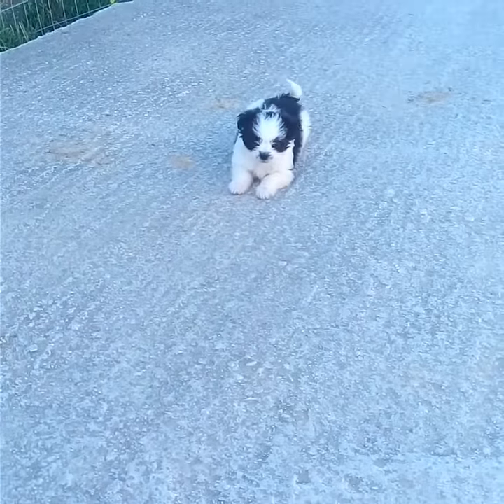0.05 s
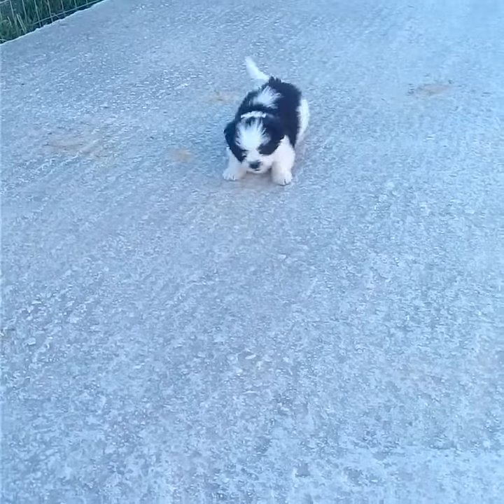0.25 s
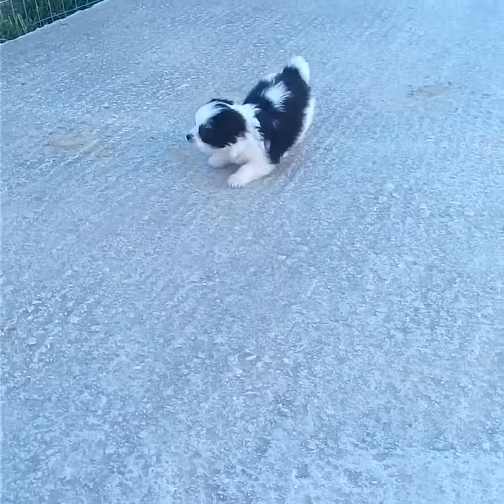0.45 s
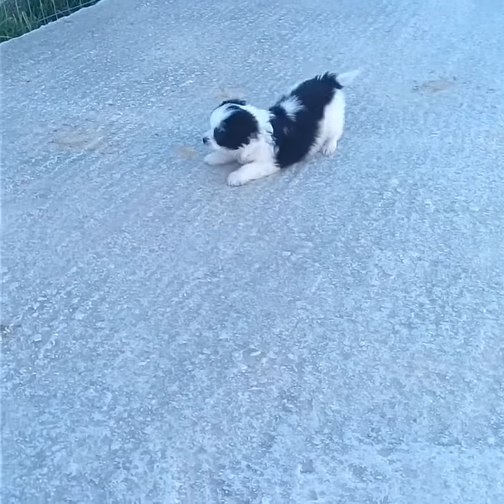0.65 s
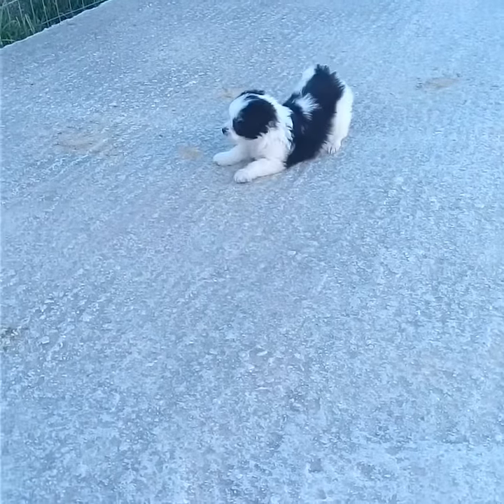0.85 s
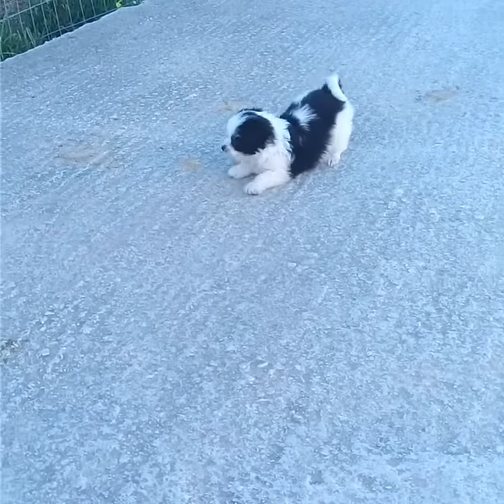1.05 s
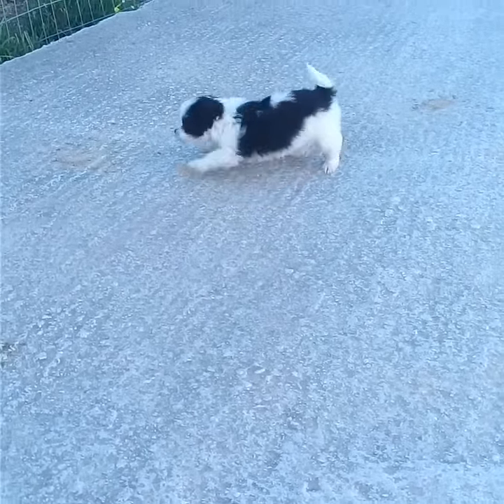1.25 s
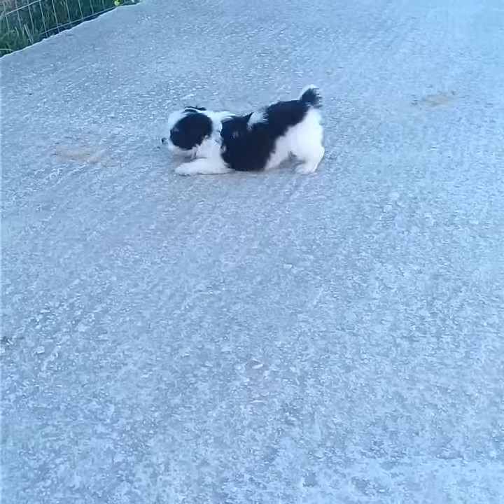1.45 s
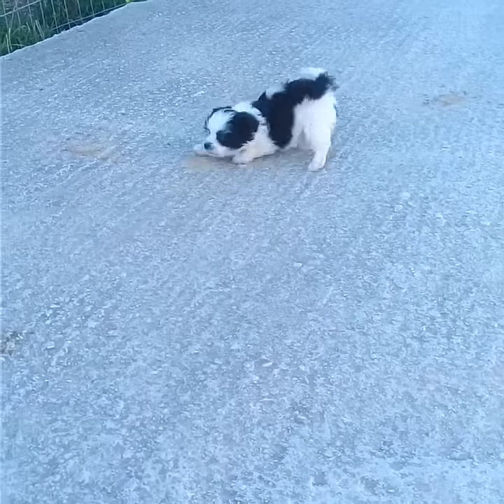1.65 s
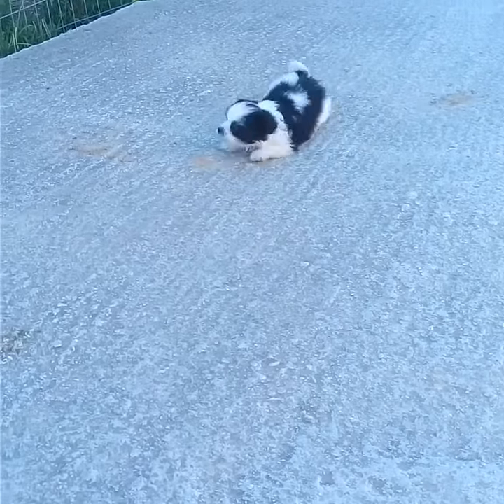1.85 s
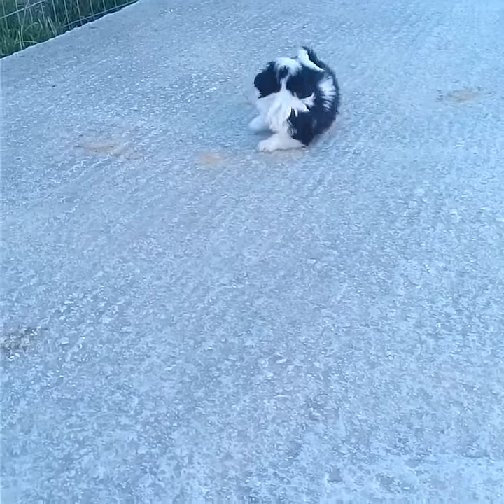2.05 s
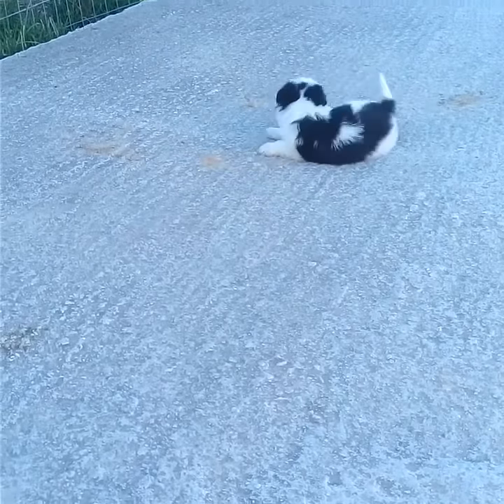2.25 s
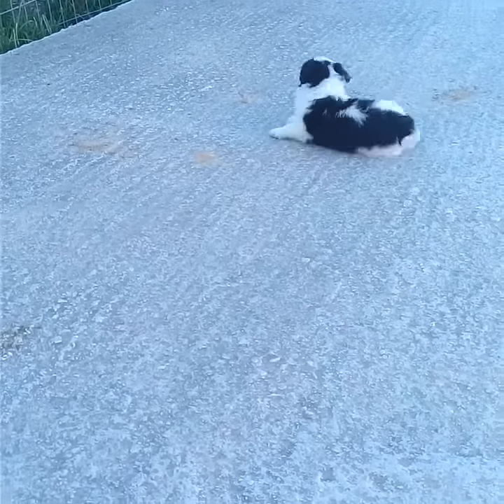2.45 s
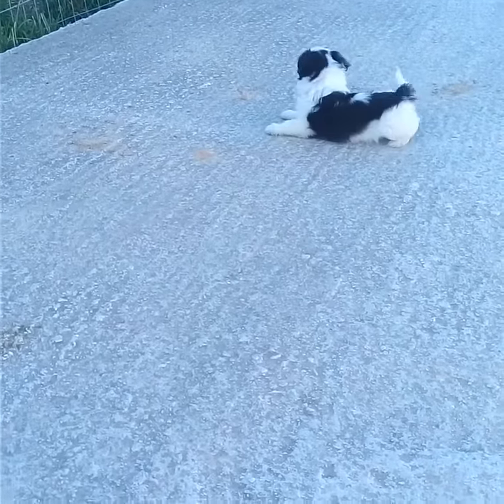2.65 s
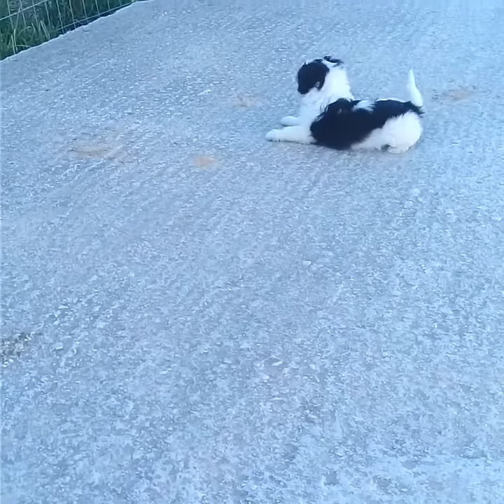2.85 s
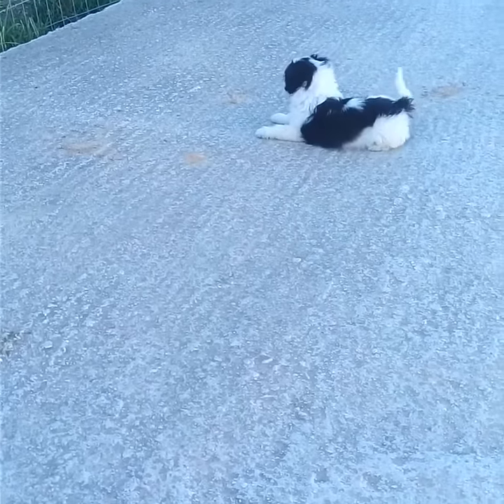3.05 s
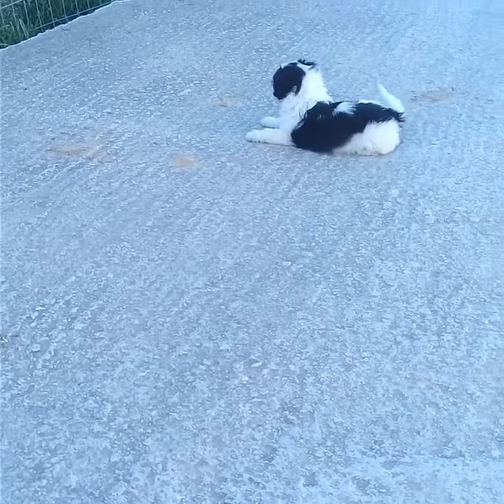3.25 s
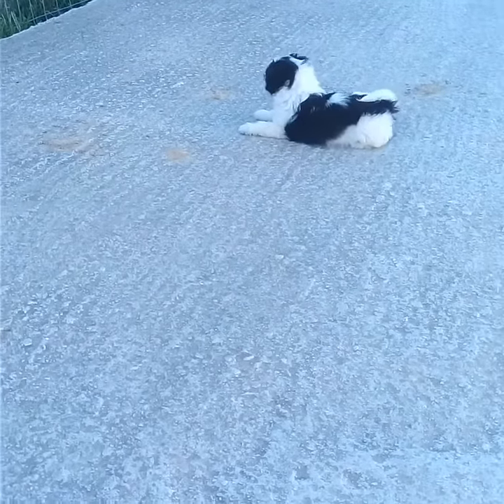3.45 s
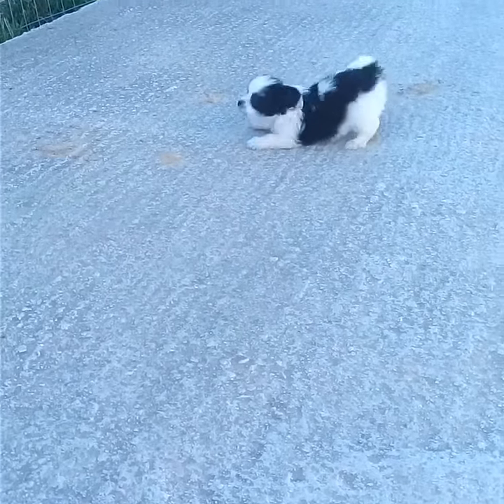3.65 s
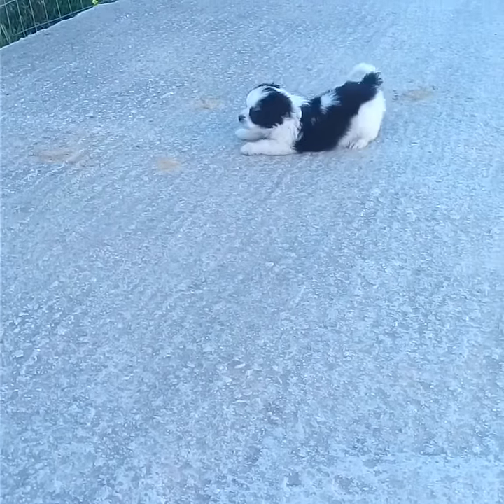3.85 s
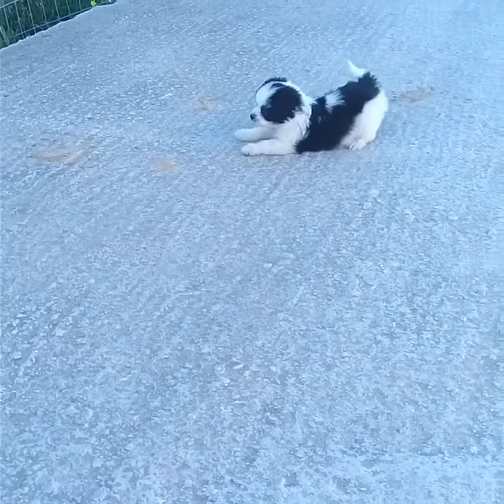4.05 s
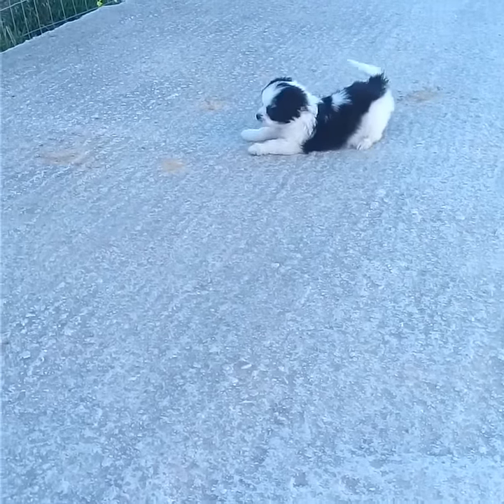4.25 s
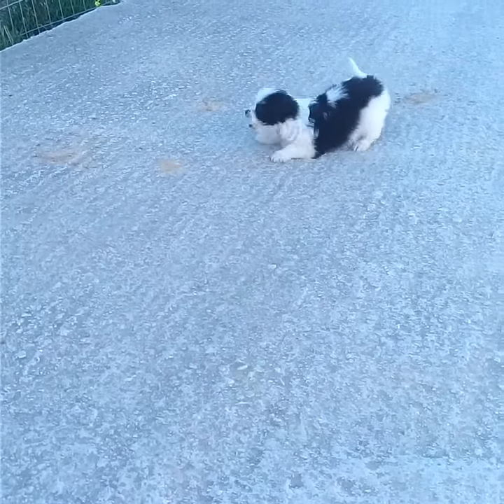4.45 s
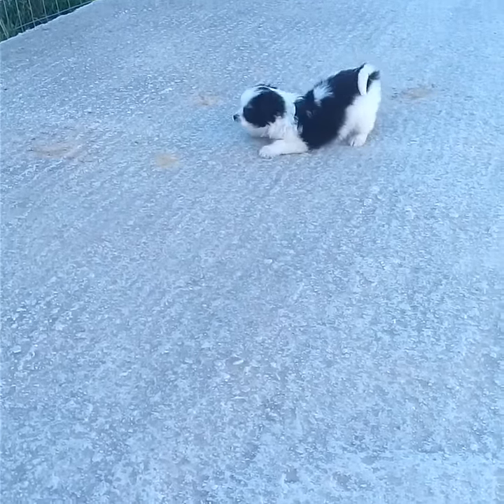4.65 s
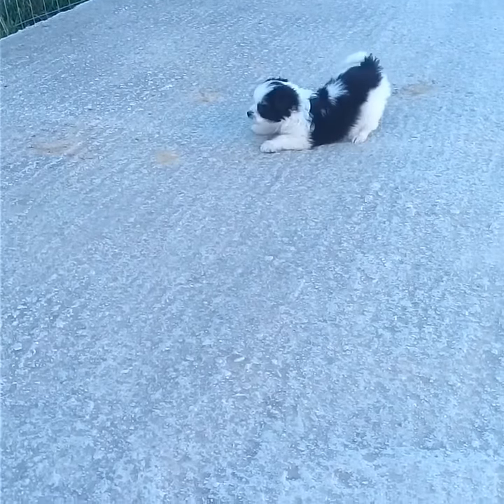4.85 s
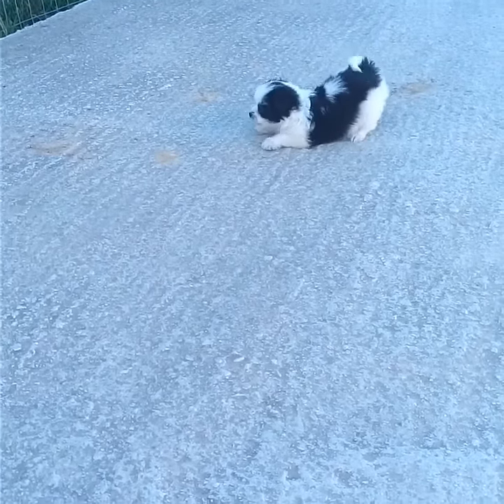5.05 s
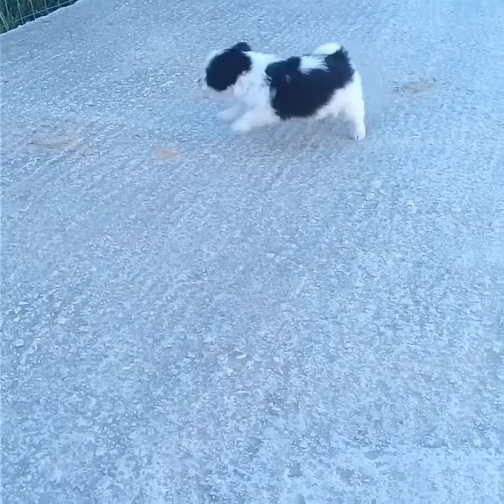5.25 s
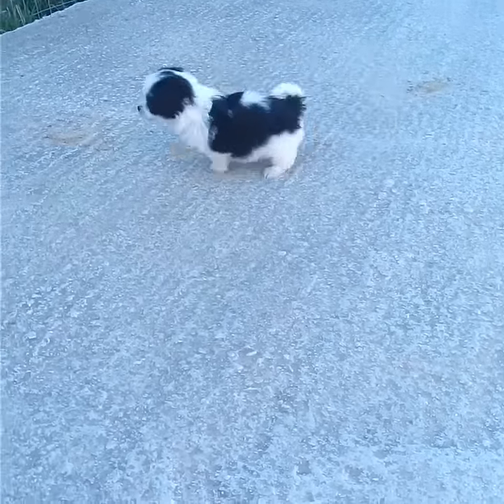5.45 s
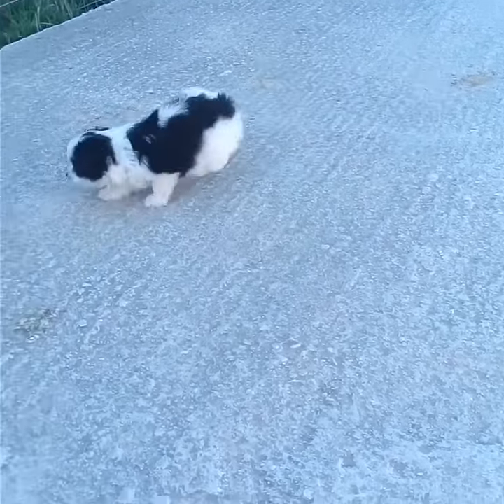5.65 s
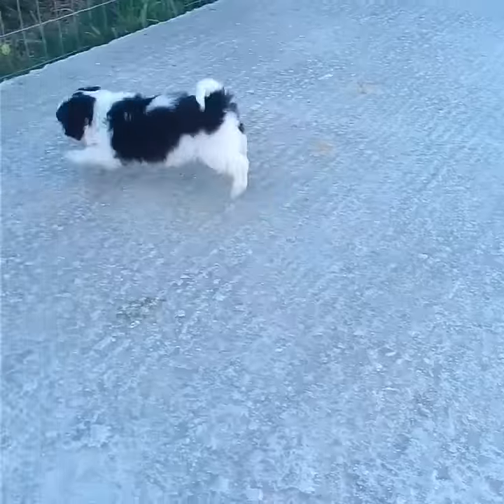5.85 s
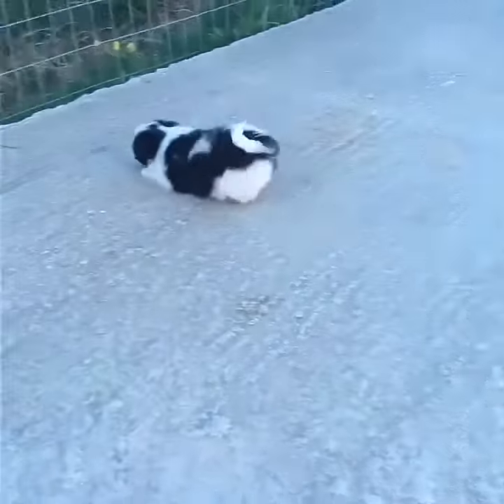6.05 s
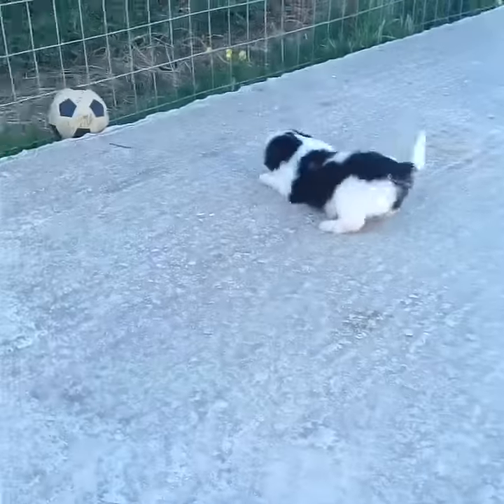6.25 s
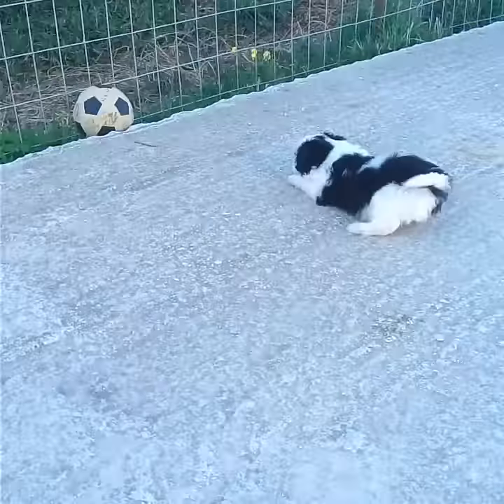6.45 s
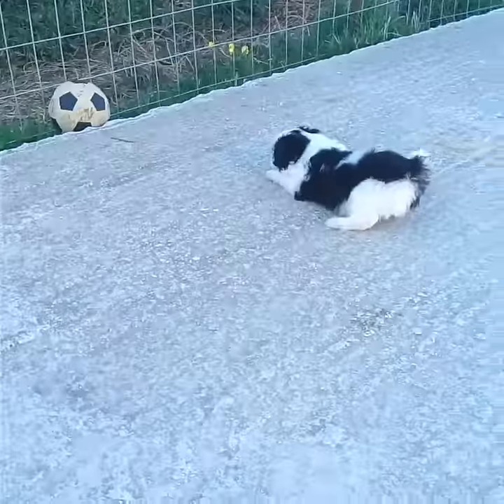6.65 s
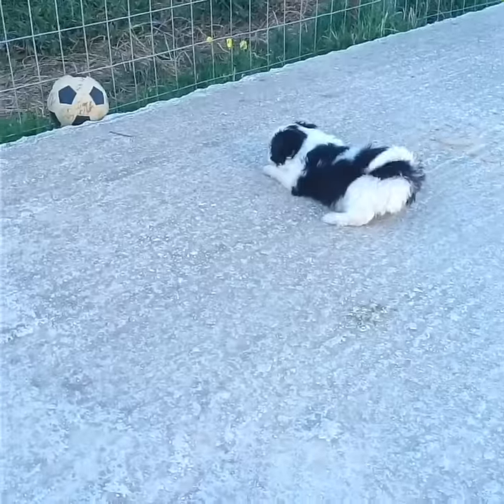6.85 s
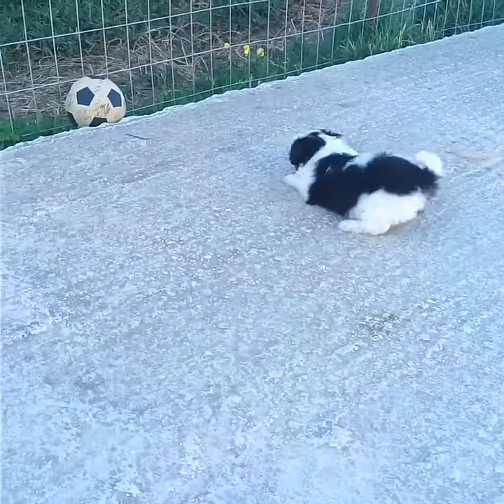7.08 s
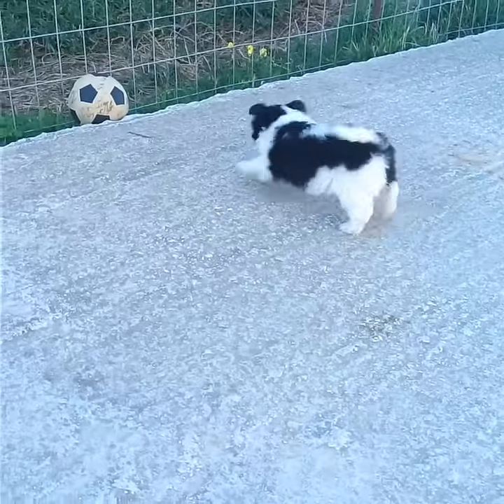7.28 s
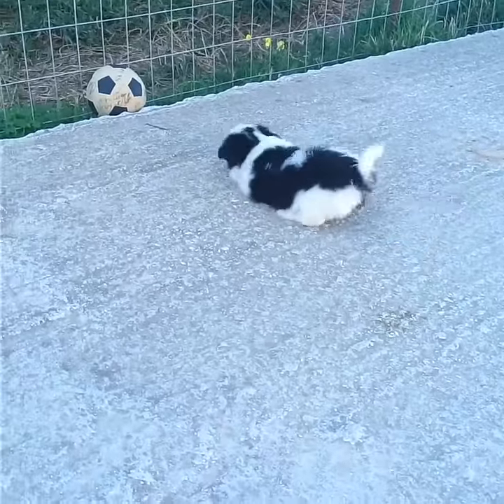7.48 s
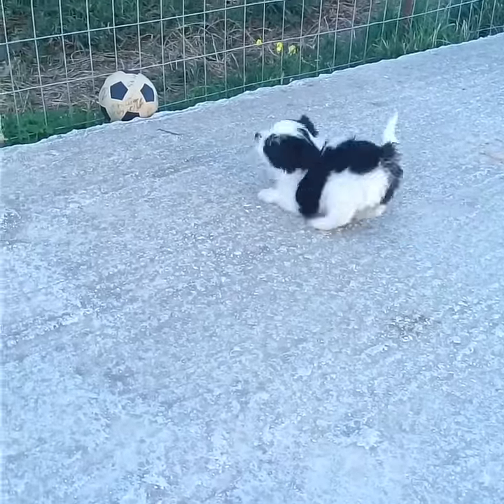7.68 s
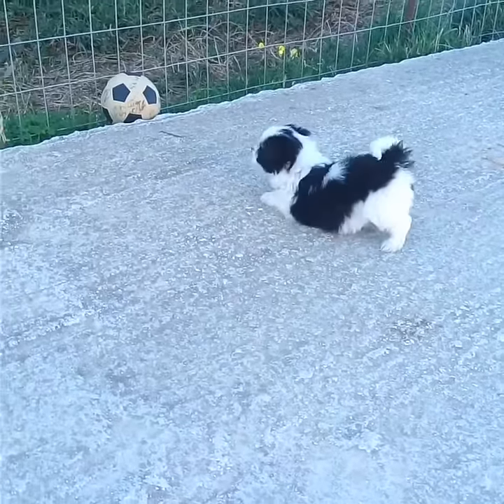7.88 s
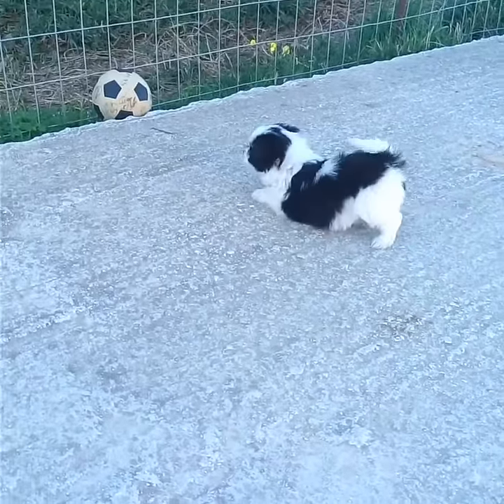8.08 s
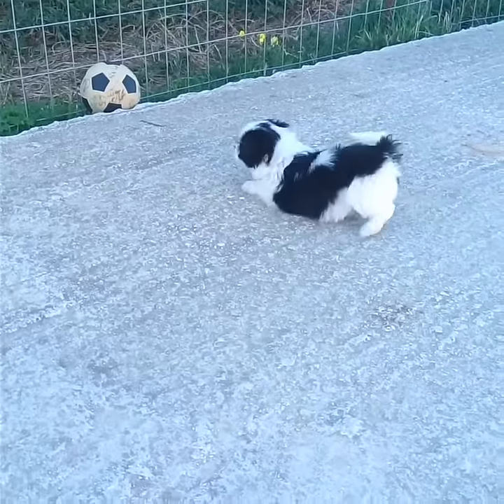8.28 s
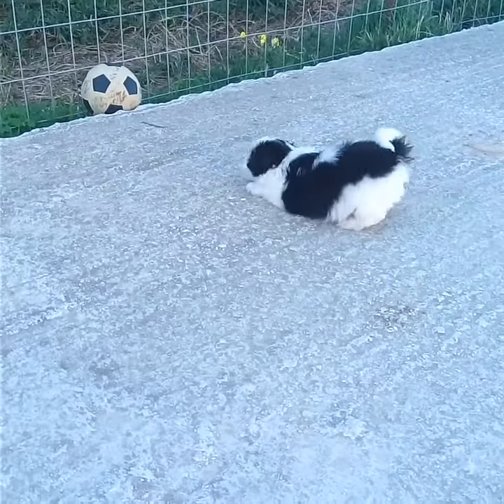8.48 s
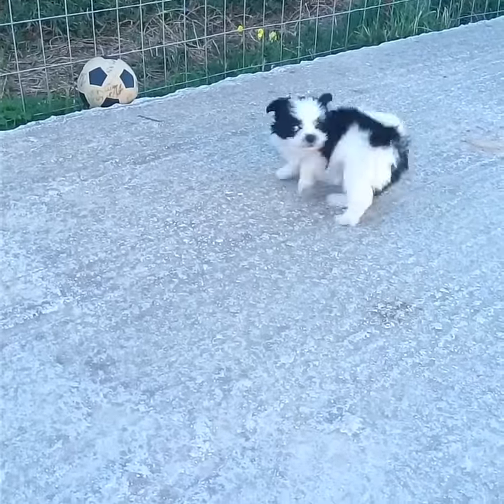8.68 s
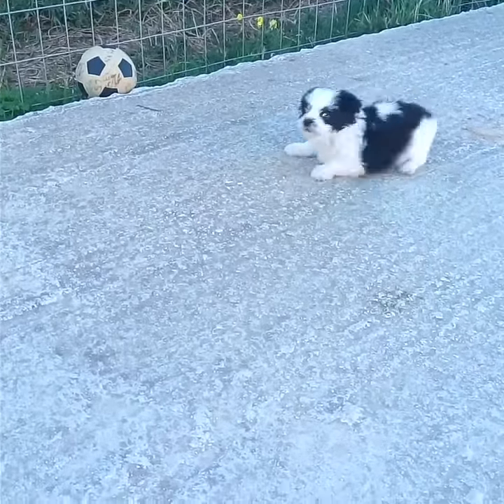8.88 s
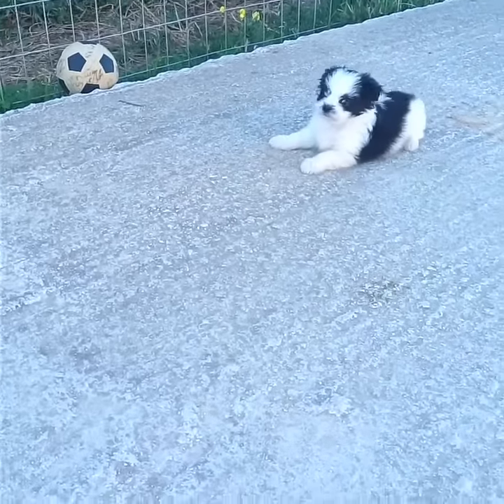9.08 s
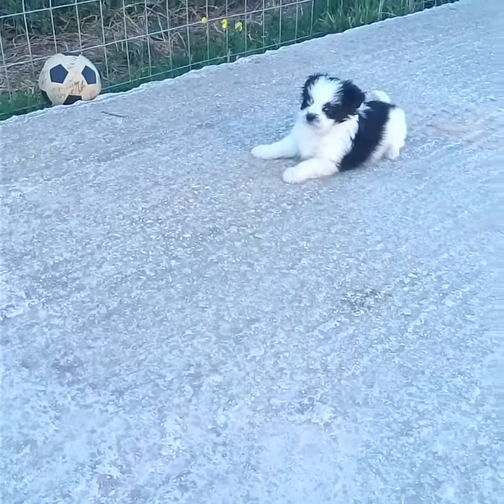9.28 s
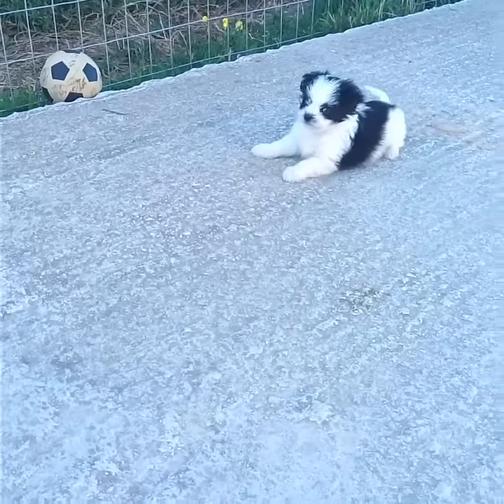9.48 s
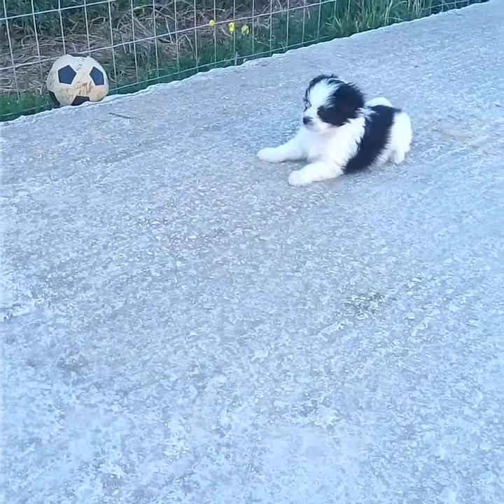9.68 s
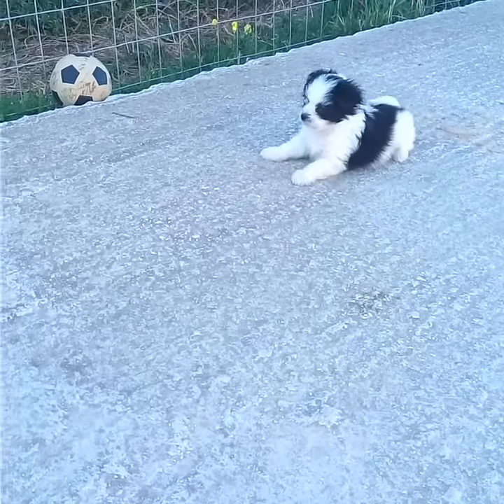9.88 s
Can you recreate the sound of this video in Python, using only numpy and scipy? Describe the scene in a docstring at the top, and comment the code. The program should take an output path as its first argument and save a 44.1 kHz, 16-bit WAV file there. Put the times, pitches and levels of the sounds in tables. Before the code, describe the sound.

A small puppy yaps close by in a concrete yard. Two sharp, high yaps come early with low muffled grumbles around them, then after a pause three more spaced yaps and a grumble. The hand-held microphone rumbles and bumps while paws scuff faintly. Two last quick yaps follow with a whimper between, then one long, wavering whine. Small birds chirp over soft airy hiss.

```python
"""A small puppy yaps on a concrete yard, close to a hand-held microphone, and small birds call behind a soft hiss.
Each yap swoops up, breaks into a high register and falls back; short grumbles come around the second yap, after
the fifth and between the last two. Before those two the microphone rumbles and bumps as it is carried, and paws
scuff. Last comes one long whine. Vocal-fold harmonics and puffs of breath through a throat make the dog's voice;
gliding sines make the birds, and filtered noise the air, the scuffs and the yard's brief ring after a call."""
import sys
import numpy as np
from scipy import signal
from scipy.fft import rfft, irfft
from scipy.io import wavfile
from scipy.ndimage import uniform_filter1d

SR = 44100
rng = np.random.default_rng(int(sys.argv[2]) if len(sys.argv) > 2 else 0)


def put_to_file(sound):
    """Save the sound as 16-bit audio at rate SR, in the file named by the first command-line argument."""
    columns = np.atleast_2d(sound).T  # one column per channel
    safe = np.clip(columns, -1, 1)
    whole_steps = np.round(safe * 32767)
    wavfile.write(sys.argv[1], SR, whole_steps.astype(np.int16))


N = 437472
TIME = np.arange(N) / SR
CUTOFF_HZ = 15500   # top of the microphone's band
TREMOR_HZ, QUIVER = 31.6, 0.053   # rate of the dog's tremor and its share of the pitch


def from_db(db):
    """Decibels to gain."""
    return 10 ** (np.asarray(db) / 20)


def rms_one(x):
    """Scale to rms 1."""
    return x / np.sqrt(np.mean(x ** 2) + 1e-20)


def ramp(t, length):
    """Rise from 0 at t = 0 to 1 at t = length."""
    return np.clip(t / length, 0, 1)


def in_time(rows, t):
    """Each column of a curve table at the times t."""
    s, *columns = np.transpose(rows)
    return [np.interp(t, s, c) for c in columns]


def at_hz(rows, hz):
    """Each column of a spectrum table at the frequencies hz, joined along log frequency."""
    points, *columns = np.transpose(rows)
    return [np.interp(np.log(np.maximum(hz, 1)), np.log(points), c) for c in columns]


def bins_hz(size):
    """Frequencies of a real FFT."""
    return np.fft.rfftfreq(size, 1 / SR)


def coloured(x, spectrum):
    """Give x a spectrum; rms 1."""
    size = x.shape[-1]
    gain = from_db(at_hz(spectrum, bins_hz(size))[0])
    return rms_one(irfft(rfft(x) * gain, size))


def wander(rate, size):
    """Normal random values, `rate` of them a second, joined by straight lines."""
    steps = np.arange(size) * rate / SR
    return np.interp(steps, np.arange(4096), rng.standard_normal(4096))


def outdoors(air_db=-68, drone_hz=1110, drone_width_hz=180):
    """Still air and a far high hiss are shaped noise; a faint drone is noise through two narrow resonances."""
    # relative spectrum of the open air: frequency_hz, density_db (per Hz)
    air_spectrum = [(30, -31), (70, -15.5), (600, 0.5), (900, -7.5), (5000, -14), (8000, -31.5),
                    (15000, -36)]
    # relative spectrum of the distant hiss: frequency_hz, density_db (per Hz)
    hiss_spectrum = [(2500, -30), (5100, -3.5), (6000, -6.5), (7000, -20.5), (15000, -24)]
    # far sounds as they come and go: time_s, hiss_db, drone_db
    distance = [(0, -74, -92.5), (3.2, -67.5, -89.5), (5.9, -69.5, -83), (6.2, -65.5, -62.5),
                (8.9, -71.5, -100), (9.8, -66.5, -65)]
    hiss_db, drone_db = in_time(distance, TIME)
    air = from_db(air_db) * coloured(rng.standard_normal((2, N)), air_spectrum)
    hiss = from_db(hiss_db) * coloured(rng.standard_normal((2, N)), hiss_spectrum)
    b, a = signal.iirpeak(drone_hz, drone_hz / drone_width_hz, fs=SR)
    once = signal.lfilter(b, a, rng.standard_normal(N))
    drone = rms_one(signal.lfilter(b, a, once))
    return air + hiss + from_db(drone_db) * drone


def birds(warble_hz=130, octave_db=-17, arch_hz=300, faint_db=-69, faint_hz=5500, count=26):
    """Low chirps arch and carry an octave, higher notes glide down; fainter falling chirps come at random."""
    # nearer bird notes: start_s, length_s, start_hz, end_hz, level_db
    bird_notes = [(0.76, 0.045, 3950, 3130, -54.5), (0.832, 0.069, 5750, 3880, -59.5),
                  (2.211, .07, 4900, 3904, -64), (2.677, .068, 3310, 2740, -47),
                  (2.767, 0.14, 4450, 4050, -60), (3.212, .043, 3020, 2890, -55),
                  (3.368, 0.056, 5000, 4000, -56.5), (3.448, .05, 4800, 4050, -62),
                  (4.294, 0.083, 3320, 2700, -65), (5.117, 0.079, 4700, 3940, -54.5),
                  (5.878, 0.099, 4840, 3910, -63), (7.295, 0.18, 8200, 7600, -62),
                  (7.735, .29, 7620, 7150, -58), (8.324, 0.23, 7620, 7020, -62),
                  (9.383, .06, 3590, 2980, -56)]
    faint_notes = []
    for place, height, drop in rng.random((count, 3)):
        start_hz = faint_hz * (.7 + height / 2)
        end_hz = start_hz - faint_hz * drop / 4
        faint_notes.append((place * (TIME[-1] - .2), .04 + .05 * drop, start_hz, end_hz, faint_db))
    out = np.zeros(N)
    for start_s, length_s, start_hz, end_hz, level_db in [*bird_notes, *faint_notes]:
        u = np.linspace(0, 1, int(length_s * SR))
        swell = np.sin(np.pi * u)
        low = start_hz < 4000
        hz = start_hz + (end_hz - start_hz) * u + low * arch_hz * swell
        phase = 2 * np.pi * np.cumsum(hz + warble_hz * wander(400, len(u))) / SR
        note = np.sin(phase) + low * from_db(octave_db) * np.sin(2 * phase)
        first = int(start_s * SR)
        out[first:first + len(u)] += from_db(level_db) * swell * note
    return out


def handling(lumpy_db=4, bump_hz=125, bump_t60=0.042):
    """Lumpy rumble, each port its own, and housing bumps: low sines that die in hundredths of a second."""
    # relative spectrum of the rumble: frequency_hz, density_db (per Hz)
    rumble_spectrum = [(30, -19), (100, 3), (190, -1), (900, -52.5)]
    # rumble of the moving microphone: time_s, level_db
    movement = [(0, -68.5), (1.3, -67), (4.5, -70), (4.75, -54), (5.8, -46), (6.1, -60), (6.35, -44),
                (6.55, -67.5), (9.9, -73)]
    # bumps on the microphone housing: start_s, level_db (before the doubling below)
    bumps = [(0.407, -42), (0.998, -49), (2.116, -51), (6.268, -35.5), (6.289, -35), (6.326, -39),
             (6.382, -34), (8.655, -50)]
    level_db, = in_time(movement, TIME)
    noise = coloured(rng.standard_normal((2, N)), rumble_spectrum)
    out = noise * from_db(level_db + lumpy_db * wander(40, N))
    t = TIME[:SR // 10]
    for start_s, bump_db in bumps:
        hz = bump_hz * from_db(rng.standard_normal((2, 1)))   # a little different at each port
        envelope = 2 * from_db(bump_db - 60 * t / bump_t60) * ramp(t, 0.00077)
        first = int(start_s * SR)
        out[:, first:first + len(t)] += envelope * np.sin(2 * np.pi * hz * t)
    return out


def yard(x, early_db=-16, early_t60=0.064, likeness=0.41, wall_s=.088, wall_db=-23.5):
    """Quick scatter off ground and fence, one dull wall echo and a tail that dies by band."""
    # the yard's tail: frequency_hz, level_db (before band filtering), t60_s
    yard_tail = [(200, -19, .4), (660, -14.5, 0.34), (1500, -18, 0.89), (3780, -14.5, 0.62),
                 (8000, -19, 0.45)]
    t = TIME[:SR]
    edges = np.geomspace(150, 14000, 13)
    response = np.zeros((2, SR))
    for low, high in zip(edges, edges[1:]):
        level_db, t60 = at_hz(yard_tail, np.sqrt(low * high))
        band = signal.butter(2, [low, high], "band", fs=SR, output="sos")
        mid, side = signal.sosfilt(band, rng.standard_normal((2, SR)))
        # likeness is the correlation of left and right
        noise = np.sqrt((1 + likeness) / 2) * mid + np.sqrt((1 - likeness) / 2) * side * [[1], [-1]]
        for db, decay in ((level_db, t60), (early_db, early_t60)):
            envelope = from_db(-60 * t / decay) * ramp(t, .012)
            response += from_db(db) * noise * envelope / np.sqrt(np.sum(envelope ** 2))
            noise = noise[:, ::-1]   # the scatter uses the noise backwards
    smear = np.hanning(13)   # dulls the echo
    lag = int(wall_s * SR)
    response[:, lag:lag + len(smear)] += from_db(wall_db) * smear / smear.sum()
    return signal.fftconvolve(x[None], response, axes=1)[:, :N]


def at_ports(x):
    """The two microphone ports hear a near source with different level and phase."""
    # the puppy at the ports: frequency_hz, left_over_right_db, left_lead_rad
    ports = [(1000, -.5, .1), (1400, 2, .7), (1700, 7, .3), (2500, 8, -.4), (3200, 6, -1.7),
             (5200, 0, -1.8)]
    balance_db, lead = at_hz(ports, bins_hz(N))
    sides = np.array([[1], [-1]])
    gains = from_db(sides * balance_db / 2)
    gains = gains / np.sqrt(np.mean(gains ** 2, axis=0))   # keeps the power of the pair
    return irfft(rfft(x) * gains * np.exp(.5j * sides * lead), N)


def paw():
    """Paws scuff the concrete: dull gritty noise that swells and fades."""
    # scuffs: middle_s, half_length_s (to 1/e), level_db
    scuffs = [(6.1, 0.015, -53.5), (6.256, 0.1054, -60.5)]
    band = signal.butter(3, [400, 2000], "band", fs=SR, output="sos")
    grit = rms_one(signal.sosfilt(band, rng.standard_normal(N)))
    return grit * sum(from_db(db) * np.exp(-((TIME - s) / width) ** 2) for s, width, db in scuffs)


def voice(t, pitch, level_db, bright_db, treble_db, rough, opening, jitter=0.048, shimmer=1.0,
          rasp_db=-5, flicker_db=3, hoarse=0.15, tiring_db=-14):
    """Vocal folds drive the throat; strain makes them jitter, triple their period and rasp."""
    # throat and muzzle, wide open: frequency_hz, level_db
    mouth_open = [(280, -30), (650, -9), (1350, -2.5), (1580, -13.5), (1850, -14.5), (2430, -9),
                  (2680, -20), (3100, -15.5), (3550, -28), (4000, -24.5), (4800, -33), (7100, -38.5),
                  (8600, -59.5), (15000, -68.5)]
    # throat and muzzle, nearly shut: frequency_hz, level_db
    mouth_shut = [(200, -9), (560, -1.5), (930, 3), (1300, -15.5), (1600, -18), (2080, -18.5),
                  (2700, -30.5), (4700, -59.5), (15000, -59)]
    # a sharp resonance of the open muzzle makes a clear yap pierce; roughness blunts it
    ring_hz, ring_width_hz, ring_db = 3920, 70, 11.5
    # pushed above this pitch, the folds begin to triple their period
    tripling_hz, tripling_span_hz, tripling_share = 1394, 120, 0.53
    open_blur, shut_blur = .18, .07   # phase slip added per harmonic, radians

    size = len(t)
    unsteady = rough * (1 - rough / 2)
    pitch = pitch * (1 + jitter * unsteady * (wander(500, size) + wander(110, size)))
    phase = 2 * np.pi * np.cumsum(pitch) / SR
    high_register = ramp(pitch - 950, 200)
    # once reached, tripling stays for as long as the pitch is in the high register
    tripling = tripling_share * np.maximum.accumulate(ramp(pitch - tripling_hz, tripling_span_hz))
    # the first push of air is the hardest: the treble sinks as the call goes on
    treble_db = treble_db + tiring_db * ramp(t - t[0] - .08, 0.49)
    tone, power = np.zeros(size), 1e-12
    for third in range(2, 60):
        multiple = third / 3
        hz = pitch * multiple
        throat_db = opening * at_hz(mouth_open, hz)[0] + (1 - opening) * at_hz(mouth_shut, hz)[0]
        throat_db += opening * (1 - rough) * ring_db / (1 + ((hz - ring_hz) / ring_width_hz) ** 2)
        overtone, treble = ramp(hz - 1600, 600), ramp(hz - 3000, 1000)
        tilt_db = overtone * (bright_db + flicker_db * wander(90, size)) + treble * treble_db * opening
        gain = from_db(throat_db + tilt_db) * (hz < CUTOFF_HZ)
        if multiple % 1:
            # period tripling puts unsteady partials between the harmonics
            gain = gain * high_register * np.maximum(rough * np.sqrt(rough), tripling * overtone)
            slip = wander(120, size)
        else:
            # the higher a harmonic and the wider the mouth, the more it blurs
            blur = opening * open_blur + (1 - opening) * shut_blur
            slip = (rough / 2 + blur * (multiple - 1)) * wander(250, size)
            # strain weakens the top harmonics of a yap
            gain = gain * from_db(-7 * treble * opening * np.clip(4 * rough, 0, 1))
        tone += gain * np.sin(phase * multiple + slip)
        power = power + gain ** 2 / 2

    # turbulence comes in one puff per cycle and passes through the same throat
    puffs = rng.standard_normal(size) * (1 + np.cos(phase))
    rasp = opening * coloured(puffs, mouth_open) + (1 - opening) * coloured(puffs, mouth_shut)
    top = signal.sosfiltfilt(signal.butter(2, 3300, "high", fs=SR, output="sos"), rasp)
    top_gain = 2 * (rough + hoarse) * from_db(bright_db + treble_db * opening)
    rasp = rough * (rasp - top) + top_gain * top
    steady = tone / np.sqrt(power)
    sound = steady * (1 + shimmer * unsteady * wander(250, size)) + from_db(rasp_db) * rasp
    # even out the running level, then apply the wanted one
    return from_db(level_db) * sound / np.sqrt(uniform_filter1d(sound ** 2, 512) + 1e-9)


def call_span(start, end, fade_s):
    """Sample numbers of a call, its fade at both ends and its tremor."""
    start, end = start - fade_s, end + fade_s
    at = np.arange(int(start * SR), int(end * SR))
    fade = ramp(np.minimum(TIME[at] - start, end - TIME[at]), 2 * fade_s)
    tremor = np.sin(2 * np.pi * TREMOR_HZ * TIME[at] + wander(25, len(at)))
    return at, fade, tremor


def muzzled(span, pitch, level_db, bright_db, rough, sputter_db=3, stagger=0.083, throb_db=2.5,
            brighten_db_per_octave=35):
    """The voice through a nearly shut mouth, quivering in pitch and level; the rougher, the less even."""
    at, fade, tremor = span
    lurch = rough * wander(60, len(at))
    pitch, level_db = pitch * (1 + stagger * lurch), level_db + sputter_db * lurch
    # pushing the pitch up brightens the voice
    bright_db = bright_db + brighten_db_per_octave * np.log2(pitch / np.median(pitch))
    pitch, level_db = pitch * (1 + QUIVER * tremor), level_db + throb_db * tremor
    out = np.zeros(N)
    out[at] = fade * voice(TIME[at], pitch, level_db, bright_db, 0, np.clip(rough, 0, 1), 0)
    return out


def whine(hum_below_hz=342, hum_span_hz=90.7, bright_db=3, rough=.08):
    """A long, clear complaint with the mouth nearly shut; at low pitch it thins to a bare sine hum."""
    # the whine's path: time_s, pitch_hz, level_db
    path = [(8.495, 337.7, -47), (8.517, 406.3, -41), (8.575, 439, -32), (8.649, 440, -34),
            (8.687, 476.8, -30), (8.749, 416, -39.5), (8.801, 481.4, -31.5), (8.857, 527.2, -29),
            (8.969, 352.4, -43.5), (9.049, 372, -38.5), (9.089, 275, -47.5), (9.18, 222.6, -54.5)]
    at, fade, tremor = span = call_span(path[0][0], path[-1][0], fade_s=0.01)
    pitch, level_db = in_time(path, TIME[at])
    thin = 0.98 * ramp(hum_below_hz - pitch, hum_span_hz)
    hum = from_db(level_db) * np.sqrt(2) * np.sin(2 * np.pi * np.cumsum(pitch) / SR)
    out = muzzled(span, pitch, level_db, bright_db, rough)
    out[at] = np.sqrt(1 - thin) * out[at] + np.sqrt(thin) * fade * hum
    return out


def grumbles(push_db_per_octave=27.5, sag_db_per_s=35, release_share=0.1, release_db=8.5):
    """Pitch goes to a crest and on to its end; level follows pitch and sags past the crest as air runs out."""
    # short grumbles and whimpers, mouth nearly shut: start_s, rise_s, fall_s, start_hz, crest_hz, end_hz,
    # crest_db, overtone_brightness_db, roughness (0-1)
    calls = [(1.127, 0.044, .014, 299, 421, 416, -34.5, -8, .3),
             (1.365, 0.11, 0.066, 714.4, 800, 747, -31.5, -0.5, .27),
             (1.511, 0.01, 0.15, 395.8, 438, 403.2, -38.5, 1, 0.6),
             (1.876, .11, .135, 378.8, 442, 401, -38.5, -5, .6),
             (2.115, 0.0625, .075, 377.4, 404.2, 378.3, -44, -1, 0.7),
             (5.686, 0.082, .07, 393.5, 486.6, 356.6, -29.5, 0, 0.3),
             (7.342, .04, .095, 626, 513, 477.7, -32, 4, 0.1)]
    out = np.zeros(N)
    for start_s, rise_s, fall_s, start_hz, crest_hz, end_hz, crest_db, bright_db, rough in calls:
        span = call_span(start_s, start_s + rise_s + fall_s, fade_s=0.0059)
        t = TIME[span[0]] - start_s - rise_s   # 0 at the crest
        pitch = np.interp(t, [-rise_s, 0, fall_s], [start_hz, crest_hz, end_hz])
        push_db = push_db_per_octave * np.log2(pitch / crest_hz)
        level_db = crest_db + push_db - sag_db_per_s * np.maximum(t, 0)
        release = 1 - ramp(fall_s - t, release_share * fall_s)   # last share of the fall
        out += muzzled(span, pitch, level_db - release_db * release, bright_db, rough)
    return out


def yaps(shut_hz=450, open_hz=640, clear_db=-3, strain_db=9, slack_db=-7, slack_treble_db=-6,
         swoop_treble_db=5, sputter_db=3.0):
    """Swoop, break, climb, fall: the mouth opens with pitch, strain shifts to the top, the end is dull and shaky."""
    # yaps: break_s, swoop_s, break_hz (pitch after the break), top_hz, climb_s, fall_s, end_hz, peak_db,
    # peak_s (after the break), break_roughness (0-1), top_roughness (0-1), overtone_brightness_db, treble_db
    calls = [(0.409, .048, 1338, 1521, 0.061, 0.031, 790, -13.5, 0.017, 0.1, 0.3, 1, 6),
             (1.225, .046, 1262, 1500, .065, .075, 757, -12, .012, .1, .5, -5, 5.5),
             (3.684, .042, 1276, 1302, 0.08, 0.021, 735, -14, 0.028, 0.4, 0.3, -11.5, 15),
             (4.528, .047, 1315, 1478, 0.051, 0.07, 629, -11, .005, .05, .5, 0.5, 3),
             (5.248, .049, 1301, 1312, 0.058, 0.072, 694.6, -9.5, .021, 0.03, 0.42, -2, 1.5),
             (7.237, 0.04, 1312, 1554, 0.06, 0.047, 1070, -9.5, 0.0027, .1, .45, -0.5, 1.5),
             (7.497, .040, 1262, 1673, 0.062, 0.081, 727, -13, .030, 0.36, 0.48, 2.5, -11)]
    # every yap starts with a swoop in the low register, which then breaks upward
    swoop_from_hz, swoop_to_hz, break_length_s = 345, 900.7, .005
    low_register_db, low_register_rough = -25.5, 0.3
    choke_s, choke_db = 0.036, 1.5   # the voice chokes briefly just before it breaks
    # the high note swells to its peak and sinks back to the level of the low register
    swell_db_per_s, sink_db_per_s = 276, 201.5
    attack_s, release_s, edge_db = 0.022, 0.0078, 23
    fall_fade_db = 3.5   # the voice fades by this much as the pitch falls back
    swoop_ease, climb_ease, fall_ease = 1.15, 1.4, 1.25   # powers that bend the pitch curves
    # roughness changes late in the climb; this share of it is gone at the end of the fall
    strain_ease, fall_clears = 10, .6

    out = np.zeros(N)
    for (s, swoop_s, break_hz, top_hz, climb_s, fall_s, end_hz, peak_db, peak_s,
         break_rough, top_rough, bright_db, treble_db) in calls:
        at, fade, tremor = call_span(s - swoop_s, s + climb_s + fall_s, fade_s=.004)
        t = TIME[at] - s   # 0 at the break
        swoop, broken = ramp(t + swoop_s, swoop_s), ramp(t + break_length_s / 2, break_length_s)
        climb, fall = ramp(t, climb_s), ramp(t - climb_s, fall_s)

        low_hz = swoop_from_hz + (swoop_to_hz - swoop_from_hz) * swoop ** swoop_ease
        climb_ratio = (break_hz / top_hz) ** ((1 - climb) ** climb_ease)
        fall_ratio = (end_hz / top_hz) ** (fall ** fall_ease)
        high_hz = top_hz * climb_ratio * fall_ratio
        pitch = (low_hz + broken * (high_hz - low_hz)) * (1 + QUIVER * fall ** 2 * tremor)
        opening = ramp(pitch - shut_hz, open_hz - shut_hz)

        strain = break_rough + (top_rough - break_rough) * climb ** strain_ease
        strain = strain * (1 - fall_clears * fall ** 2)
        rough = np.clip((1 - broken) * low_register_rough + broken * strain, 0, 1)
        overtones_db = clear_db + bright_db + strain_db * rough + slack_db * fall
        top_db = treble_db + swoop_treble_db * (1 - broken) + slack_treble_db * fall

        low_db = low_register_db - choke_db * ramp(t + choke_s, choke_s)
        below_peak_db = np.maximum(swell_db_per_s * (peak_s - t), sink_db_per_s * (t - peak_s))
        high_db = np.maximum(peak_db - below_peak_db, low_register_db)
        edges = ramp(t + swoop_s, attack_s) * np.sqrt(ramp(t[-1] - t, release_s))
        level_db = low_db + broken * (high_db - low_db)
        level_db = level_db - edge_db * (1 - edges) - fall_fade_db * fall ** 2
        level_db = level_db + sputter_db * rough * wander(120, len(t))
        out[at] += fade * voice(TIME[at], pitch, level_db, overtones_db, top_db, rough, opening)
    return out


def scene(bird_wet_db=3):
    """The puppy is near and dry, the birds are farther and wetter."""
    song = birds()
    dog = paw() + whine() + grumbles() + yaps()
    ringing = yard(dog + from_db(bird_wet_db) * song)
    return outdoors() + song + handling() + ringing + at_ports(dog)


def record(dry):
    """The top is cut steeply."""
    return signal.sosfilt(signal.ellip(10, .1, 80, CUTOFF_HZ, fs=SR, output="sos"), dry)


dry = scene()
out = record(dry)
put_to_file(out)
```